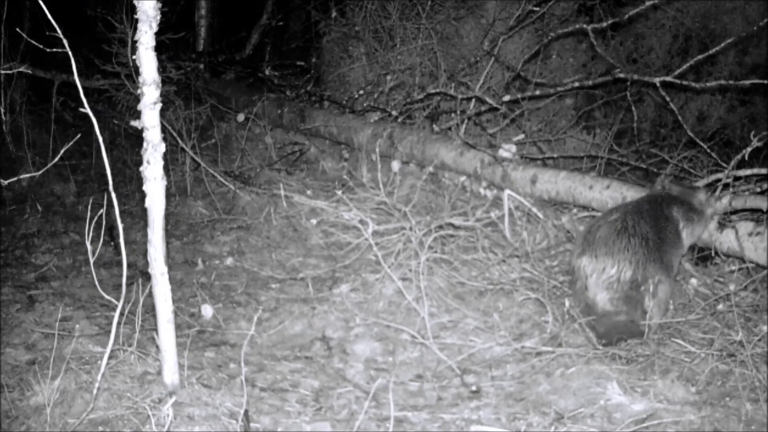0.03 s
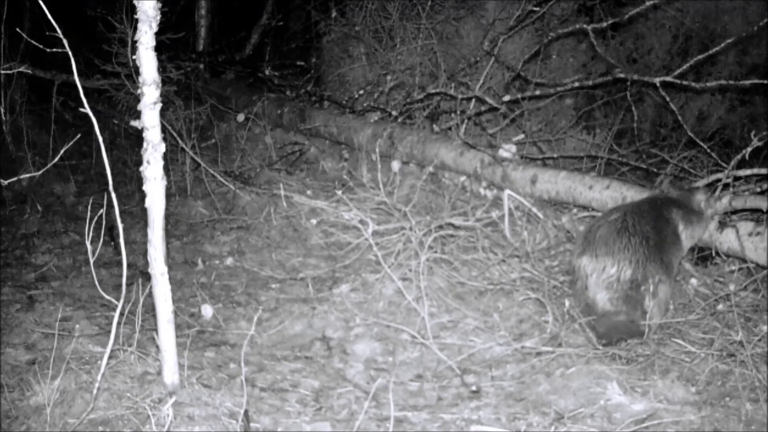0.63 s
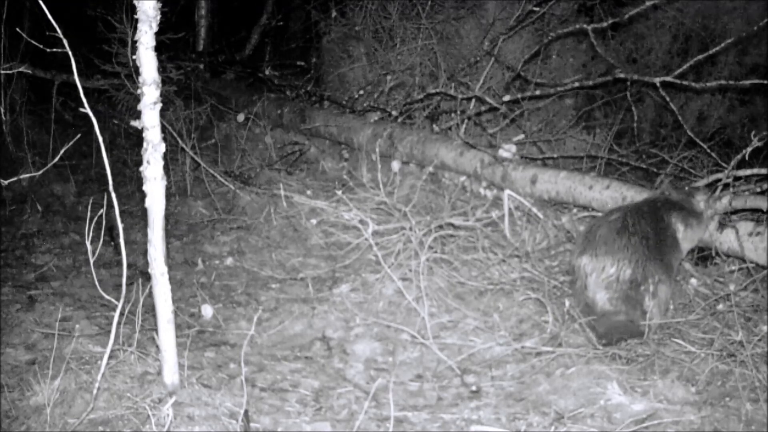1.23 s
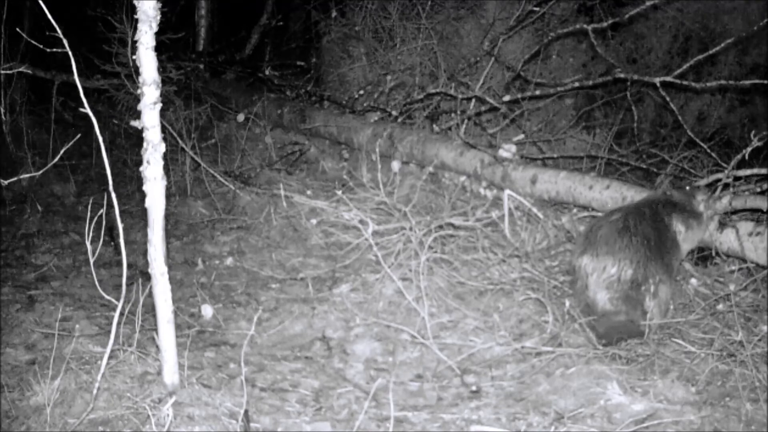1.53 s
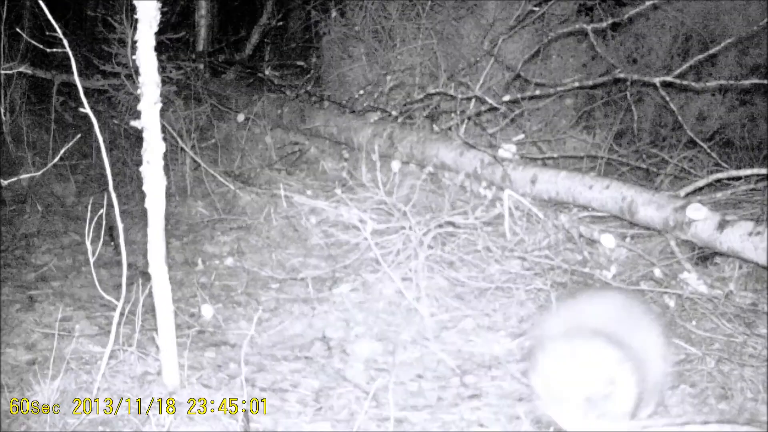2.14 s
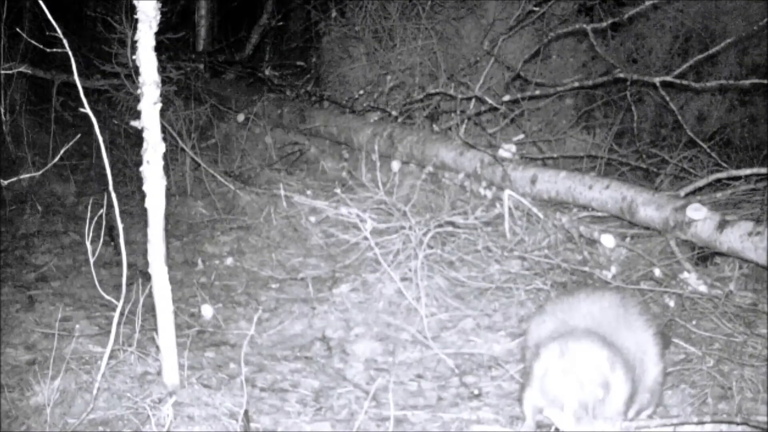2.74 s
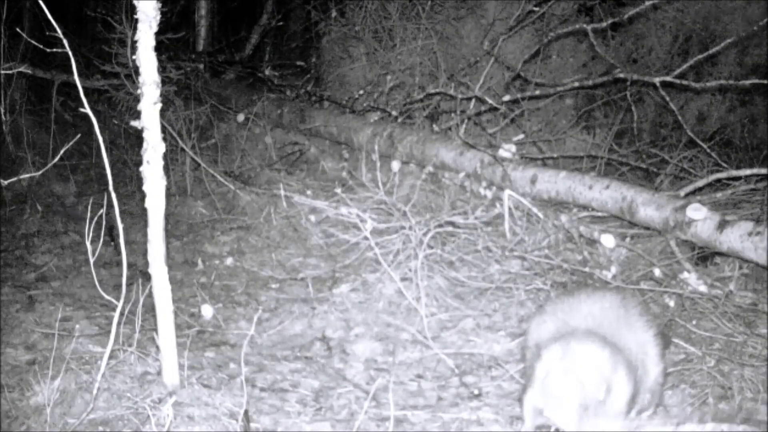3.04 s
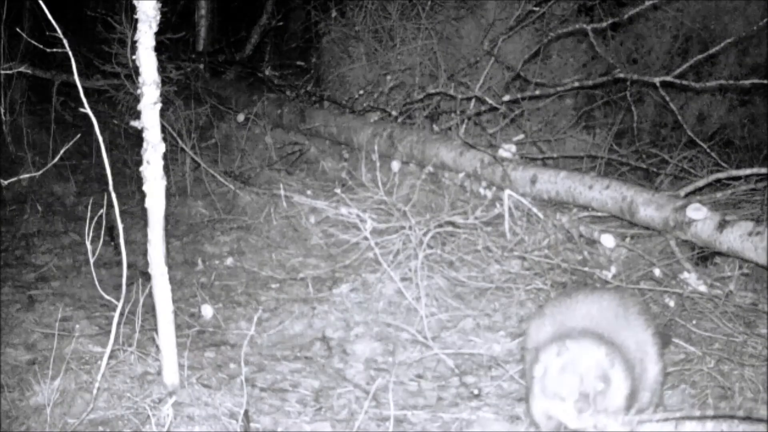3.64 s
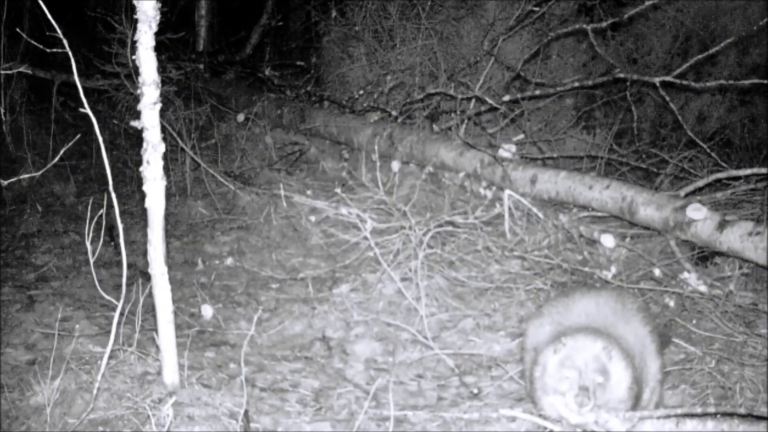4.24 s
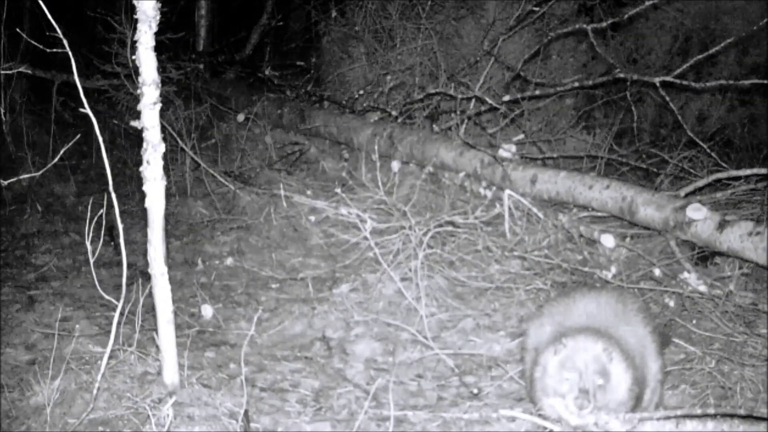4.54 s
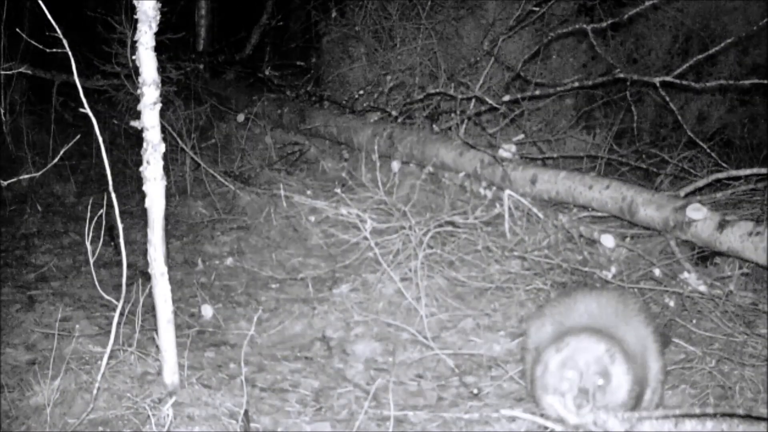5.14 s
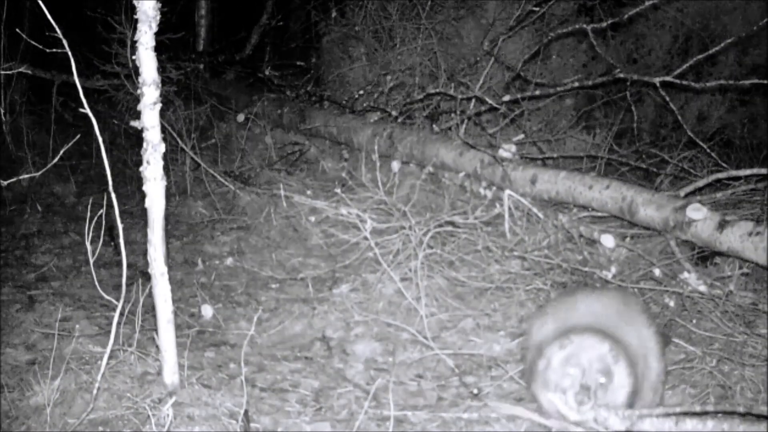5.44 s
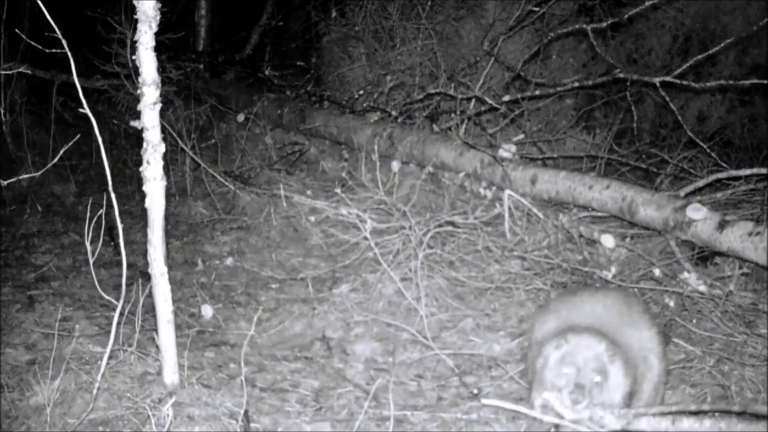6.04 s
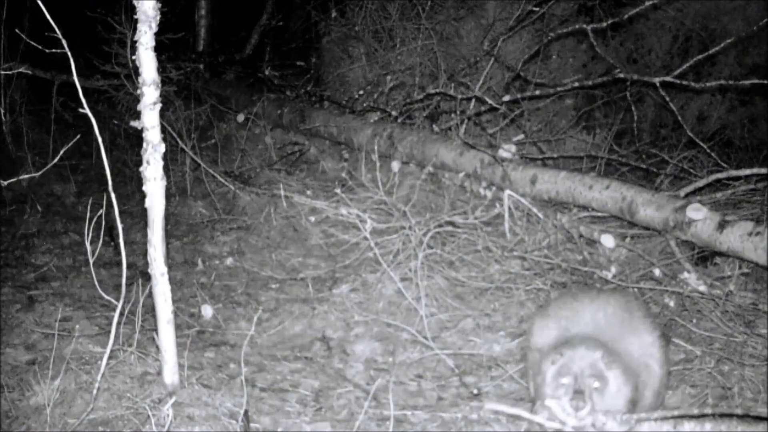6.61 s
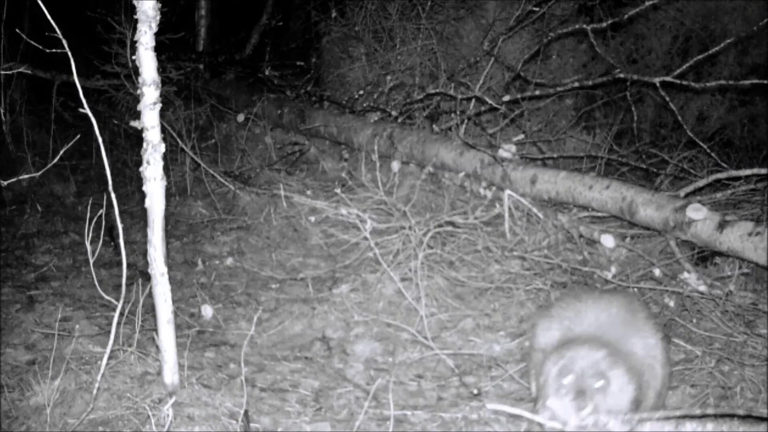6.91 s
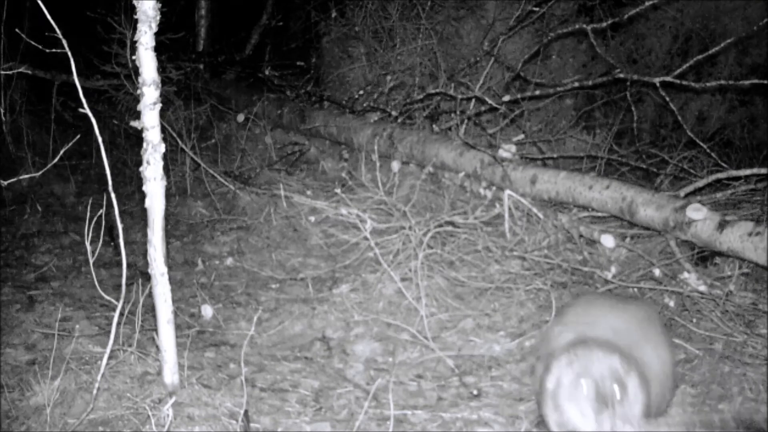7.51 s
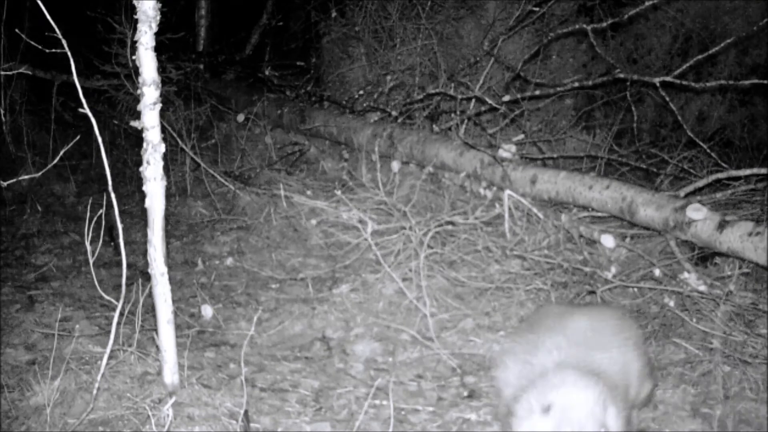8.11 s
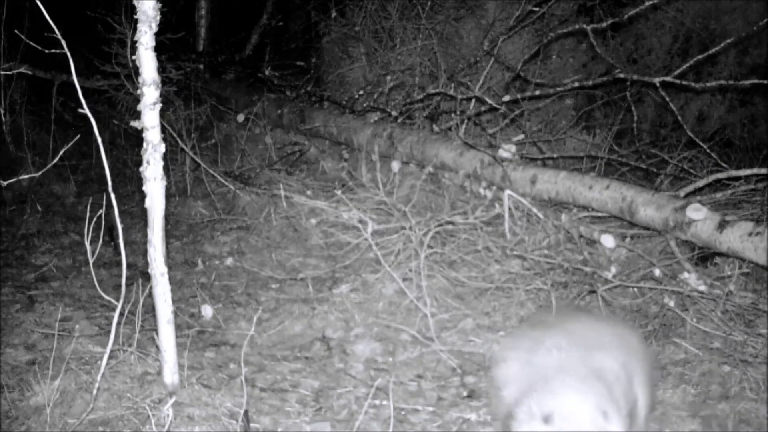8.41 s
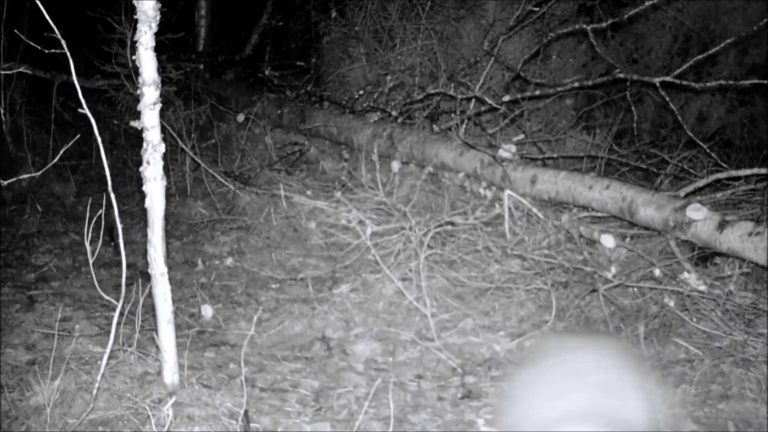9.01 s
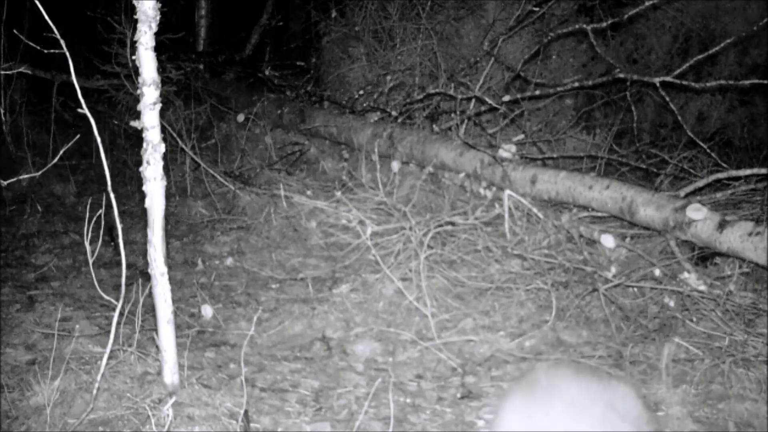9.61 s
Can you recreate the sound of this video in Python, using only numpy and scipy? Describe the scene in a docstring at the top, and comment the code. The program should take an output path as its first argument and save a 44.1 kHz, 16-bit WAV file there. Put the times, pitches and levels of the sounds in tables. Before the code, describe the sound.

Over the even hiss of an outdoor microphone, teeth scrape and tear rhythmically at a branch, which splits with a ringing crack. A tiny dropout and a pop follow. Then come soft, scattered rustles as a beaver moves through dry leaves nearby, with ticks and one sharp twig snap. The rustling grows toward the end, joined by a dragged, knocking stick and faint low puffs of air.

```python
"""First you hear a beaver gnawing a fallen tree's branch at night: seven strokes of its teeth tear
fibres and make the wood ring, until the branch gives way with a crack. The trail camera that is
listening cuts out and wakes with a pop. Now close by, the animal shifts in dry leaves and pushes
a loose stick, which scrapes and knocks. Twigs and splinters snap here and there. Behind it all are
the camera's own hiss, a faint hum and puffs of air on the microphone."""
import sys
import numpy as np
from scipy import signal
from scipy.fft import rfft, irfft
from scipy.io import wavfile

SR = 44100
rng = np.random.default_rng(int(sys.argv[2]) if len(sys.argv) > 2 else 0)


def persist_wave(psi):
    """Save psi, clipped to +-1, as 16-bit WAV."""
    counts = np.round(np.clip(psi, -1, 1) * 32767).astype(np.int16)
    wavfile.write(sys.argv[1], SR, np.atleast_2d(counts).T)


N = 430416
T = np.arange(N) / SR

# Strokes of the teeth. Each row: hardest moment in seconds, level in dB, build and release in seconds.
TOOTH_STROKES = [(0.061, -33, 0.057, 0.096), (.33, -31, 0.077, 0.071), (0.663, -30.5, 0.048, 0.069),
                 (.955, -31, 0.049, 0.099), (1.297, -48, 0.0099, 0.033), (1.483, -37, 0.013, 0.097),
                 (1.76, -37, 0.041, 0.044)]
# Bundles of fibres breaking. Each row: time in seconds, level in dB, the wood's share in dB.
FIBRE_BREAKS = [(0.0598, -24, -12), (0.34, -24, -23), (0.414, -15, -11), (0.6083, -14.5, -10),
                (0.9112, -23, -10), (0.942, -17.5, -17), (0.9557, -20, -9), (1.2885, -22.5, -4.5),
                (1.301, -20, -31), (1.3295, -17, -31), (1.486, -13, -23), (1.4944, -23, -19),
                (1.55, -17.5, -11), (1.783, -25.5, -10), (1.8157, -19.5, -5.5)]
# Sharp pitched cracks of wood: twigs snapping and splinters breaking from the bitten branch.
# Each row: time in seconds, level in dB, pitch in Hz, the raw crack's share in dB.
WOOD_CRACKS = [(0.1763, -31, 4200, -2), (0.415, -11.5, 3260, -4), (0.4168, -20.5, 1800, -9),
               (0.4578, -30, 1400, -7), (1.114, -35.5, 6600, 2), (1.3734, -29.5, 1390, -3),
               (1.9939, -40, 8500, 3), (3.1205, -39, 9800, 4), (3.7097, -30, 7200, 2.5),
               (5.0478, -37, 2600, 1), (5.648, -40.5, 5570, 0), (6.342, -35.5, 6400, -3),
               (6.759, -47, 1660, 11), (6.8126, -17, 2470, -6.5), (7.187, -29.5, 2870, -1),
               (7.4313, -30, 4700, 2.5), (7.7107, -37, 9640, 7), (7.9312, -37, 4530, -1),
               (8.3164, -33, 11300, -1), (8.3821, -31.5, 8850, 1.5), (8.6575, -28.5, 4400, 4),
               (8.9679, -27.5, 4500, 3.5), (9.091, -33, 9900, 5.5), (9.2113, -32.5, 8400, 7),
               (9.7268, -27.5, 2930, 0)]
# The animal shifts in the leaves. Each row: fullest moment in seconds, level in dB, length in seconds.
SHUFFLES = [(2.285, -41, 0.031), (2.343, -47, 0.065), (2.448, -47, 0.16), (2.8, -52, 0.066),
            (3.3, -44.5, 0.048), (3.584, -42, 0.089), (3.91, -44.5, .06), (5.054, -41.5, 0.026),
            (5.218, -42.5, 0.21), (5.588, -50.5, .11), (6.35, -49, .04), (6.806, -42, .03),
            (6.978, -44, .11), (7.11, -51, .05), (7.195, -44, 0.067), (7.653, -45.5, 0.36),
            (7.804, -42.5, 0.18), (7.94, -39, 0.031), (8.08, -45, .05), (8.154, -40.5, 0.08),
            (8.228, -41, 0.033), (8.277, -40, .06), (8.66, -36, 0.039), (8.763, -49, 0.11),
            (9.013, -43.5, 0.15), (9.213, -49, 0.073), (9.438, -50, 0.23), (9.736, -39, 0.19)]
# Drags of the stick. Each row: hardest moment in seconds, level in dB, build and release in seconds.
STICK_DRAGS = [(7.243, -41.5, 0.017, 0.015), (8.165, -44, 0.15, 0.031), (8.265, -44, 0.064, 0.075),
               (9.05, -43, 0.075, 0.1), (9.385, -37.5, 0.047, 0.062), (9.5, -39.5, 0.065, 0.14),
               (9.72, -43.5, 0.077, .06)]
# The stick catches. Each row: time in seconds, level in dB, the bright click's share in dB.
STICK_KNOCKS = [(8.156, -42.5, 10), (8.1812, -33, -12), (8.261, -34, -6), (8.715, -31, -9),
                (8.782, -36, -4), (8.919, -38, -14), (9.3822, -34, 1), (9.4447, -36, -4),
                (9.4668, -31.5, 3), (9.4934, -32, -1), (9.5156, -31.5, -5), (9.569, -38, -7)]
# Air moving on the microphone. Each row: time in seconds, level in dB.
SLOW_DRAUGHT = [(0, -38.5), (2.9, -37), (3.5, -30), (5.5, -38.5), (5.85, -27), (7.9, -28), (8.5, -16),
                (9.0, -26.5), (9.76, -25.5)]
AIR_PUFFS = [(.47, -28), (1.38, -35), (3.42, -34), (4.248, -29), (5.08, -36.5), (5.85, -23), (7.3, -20),
             (8.2, -39), (8.57, -17)]

# Tones that wood rings with. Each row: pitch in Hz, width in Hz (wider dies sooner), level in dB.
BITE_TONES = [(2510, 540, -1.5), (3620, 400, -0.5), (4840, 690, -2.5), (5570, 280, 1.5), (6330, 420, 7),
              (8380, 540, 6.5), (9000, 960, 3.5), (11030, 1140, 3), (11500, 330, 3), (13060, 840, 3),
              (15200, 900, -8)]  # the bright rasp at the teeth
BRANCH_TONES = [(136, 105, -6.5), (508, 26, -7.5), (865, 89, -12), (1071, 41, -2.5), (1320, 65, -3),
                (1378, 123, 1), (1437, 104, 2.5), (1805, 58, -8), (2035, 56, -10.5)]  # the gnawed wood
LIMB_TONES = [(173.5, 21, -1), (287, 13, -3), (343, 17, -2), (402, 37, -13), (503, 19, -6.5),
              (580, 29, -13), (712, 78, -12), (925, 40, -7.5)]  # the low ring of the whole limb
SPLIT_TONES = [(1400, 110, 5), (1940, 100, 0.5), (2340, 260, -8), (3960, 550, -4.5), (5630, 3200, -15),
               (7700, 360, 4), (8850, 1200, -9), (10430, 780, -7.5), (13700, 950, -7)]  # the bright final crack
STICK_TONES = [(706, 120, -0.5), (1278, 115, 3.5), (1620, 220, -8), (1839, 66, 5), (2660, 730, -8),
               (4000, 980, -6), (4830, 330, -4.5), (6000, 450, -14.5), (7400, 270, -8)]  # the loose stick

# Leaves of different sizes crinkling. Each row: middle pitch in Hz, level in dB.
CRINKLE_BANDS = [(2000, -8), (3200, -7), (4800, -1.5), (7000, -1), (9800, -2.5), (13000, 0)]
# Tone colours: how strong the lows and highs are. Each row: frequency in Hz, relative level in dB.
LEAF_COLOUR = [(300, 3.5), (1300, 4), (3000, 2.5), (5500, 4.5), (7500, 5), (9700, 6.5), (12500, -2),
               (15000, -1.5)]
KNOCK_COLOUR = [(300, 1), (1300, -2.5), (1850, 4), (2500, 4), (4000, -3.5), (9000, -5.5)]
HISS_COLOUR = [(30, 12), (100, 4), (300, 0), (600, -2.5), (1200, -7.5), (3000, -12), (7000, -16.5),
               (15000, -17.5)]
AIR_COLOUR = [(1, -6.5), (7, 1.5), (14, -7.5), (25, -12.5), (45, -33), (90, -38.5), (300, -84),
              (1000, -100)]

LEAD_S = .008  # every crack begins this long before its peak


def gnawing():
    """The front teeth stick and slip through the wood; each slip tears fibres and shakes the branch."""
    slips = fading_pulses(rate=260, spread_db=1.5, fade_s=.0028)
    tearing = grains(rate=7000, spread_db=4.5) * (.5 + .34 * unit(slips))
    teeth, limb = np.zeros(N), np.zeros(N)
    for s, db, build, release in TOOTH_STROKES:
        cut = stroke(s, build, release) * tearing
        teeth += undb(db) * cut
        limb += undb(-48 + 6.5 * s) * cut  # the deeper the notch, the more the limb swings
    fibres, wood = undb(-6) * teeth, undb(-4) * teeth
    for s, db, wood_db in FIBRE_BREAKS:
        crack = undb(db) * fracture(tail_db=-12, tail_s=.011)
        add(fibres, s, undb(-5) * crack)
        add(wood, s, undb(wood_db + 2) * crack)
    return ring(fibres, BITE_TONES) + ring(wood, BRANCH_TONES) + ring(limb, LIMB_TONES)


def branch_break(break_s=1.9025, rip_s=.024):
    """The last bite splits the wood and frees the limb, which rings low while its last splinters rip."""
    ripping = (T > break_s) * np.exp(-np.abs(T - break_s) / rip_s)
    jolt = undb(-17.5) * grains(rate=3200, spread_db=4) * ripping
    jolt[int(break_s * SR)] += 3  # one sharp kick as the limb comes free
    split = np.zeros(N)
    add(split, break_s, fracture(tail_db=-20.5, tail_s=.016))
    return undb(-8) * (ring(jolt, LIMB_TONES) + undb(3) * ring(split, SPLIT_TONES))


def wood_cracks():
    """Twigs, and splinters of the bitten branch, crack sharply and spring back at their own pitch."""
    snaps = np.zeros(N)
    for s, db, hz, crack_db in WOOD_CRACKS:
        crack = fracture(tail_db=-14, tail_s=.012)
        kick = .4 * crack
        kick[int(LEAD_S * SR)] += 5
        width = .3 * hz
        band = signal.butter(2, [hz - width / 2, hz + width / 2], "band", fs=SR)
        twang = signal.lfilter(*band, kick) * np.sqrt(SR / 2 / width)
        add(snaps, s, undb(db) * (twang + undb(crack_db) * crack))
    return colour(snaps, [(200, 9), (1500, 3.5), (9000, 7.5), (15000, 3.5)])


def rustling_leaves(sets_off_s=6.23, rise_db_per_s=4.5, crispness=.57):
    """Fur brushes dry leaves, which crinkle with each shuffle and stir more as the animal comes near."""
    stirring = undb(-59.5 + rise_db_per_s * np.maximum(T - sets_off_s, 0))
    shuffle_power = sum((undb(db) * swell(s, length, build=.55)) ** 2 for s, db, length in SHUFFLES)
    motion = np.sqrt(stirring ** 2 + shuffle_power)
    brush = np.sqrt(1 - crispness ** 2) * grains(rate=12000, spread_db=-2.5)
    crinkle = np.zeros(N)
    for hz, db in CRINKLE_BANDS:
        crumple = fading_pulses(rate=90, spread_db=5.5, fade_s=.0016)
        band = signal.butter(2, [hz * .75, hz * 1.25], "band", fs=SR)
        crinkle += undb(db) * signal.lfilter(*band, crumple * rng.standard_normal(N))
    return colour(brush + crispness * unit(crinkle), LEAF_COLOUR) * motion


def dragged_stick():
    """The stick scrapes over the ground, catching now and then with a scuffing knock."""
    force = sum(undb(db) * stroke(s, build, release) for s, db, build, release in STICK_DRAGS)
    scrape = force * grains(rate=1800, spread_db=3.5)
    knocks, clicks = np.zeros(N), np.zeros(N)
    for s, db, click_db in STICK_KNOCKS:
        scuff = fracture(tail_db=-3, tail_s=.006)
        add(knocks, s, undb(db) * scuff)
        add(clicks, s, undb(db + click_db) * scuff)
    return ring(scrape + colour(knocks, KNOCK_COLOUR), STICK_TONES) + colour(clicks, LEAF_COLOUR)


def hiss_and_air(hum_hz=167):
    """The camera's even hiss, a faint hum, and slow air that now and then puffs on the microphone."""
    hiss = undb(-42.5) * colour(rng.standard_normal(N), HISS_COLOUR)
    hum = undb(-59) * np.sin(2 * np.pi * hum_hz * T)
    draught = undb(np.interp(T, *np.transpose(SLOW_DRAUGHT)))
    puffs = sum(undb(db) * swell(s, length=.16, build=.44) for s, db in AIR_PUFFS)
    return hiss + hum + (draught + puffs) * colour(rng.standard_normal(N), AIR_COLOUR)


def fracture(tail_db, tail_s, crackle_s=.0025, rise_s=.00035, fall_s=.0008):
    """One crack: the first fibres crackle, the rest part at once, and splinters die away."""
    t = T[:SR // 10] - LEAD_S
    snap = np.exp(np.where(t < 0, t / rise_s, -t / fall_s))
    splinters = np.exp(np.where(t < 0, t / crackle_s, -t / tail_s))
    return (snap + undb(tail_db) * splinters) * rng.choice([-1, 1], len(t))


def grains(rate, spread_db):
    """Tiny clicks of uneven size at random moments, about `rate` of them a second."""
    sizes = undb(spread_db * np.minimum(rng.exponential(size=N), 4))
    return unit((rng.random(N) < rate / SR) * sizes * rng.choice([-1, 1], N))


def fading_pulses(rate, spread_db, fade_s):
    """A strength that jumps up at random moments and fades after each jump."""
    return signal.lfilter([1], [1, -np.exp(-1 / (fade_s * SR))], np.abs(grains(rate, spread_db)))


def stroke(s, build, release):
    """A push that builds to its hardest at time s and lets go."""
    return np.sqrt(np.interp(T, [s - build, s, s + release], [0, 1, 0]))


def swell(s, length, build):
    """A smooth rise and fall, fullest at time s; build is the share of the length spent rising."""
    return np.exp(-((T - s) / (length * np.where(T < s, build, 1 - build))) ** 2)


def ring(x, tones):
    """Wood shaken by x rings with these tones, each dying away at its own speed."""
    t = T[:SR // 5]
    ringing = sum((-1) ** k * undb(db) * width * np.exp(-np.pi * width * t) * np.sin(2 * np.pi * hz * t)
                  for k, (hz, width, db) in enumerate(tones))
    return signal.fftconvolve(x, ringing / np.linalg.norm(ringing))[:len(x)]


def colour(x, points):
    """Turn the lows and highs of x up or down along a curve of (Hz, dB) points."""
    hz, db = np.transpose(points)
    frequencies = np.arange(N // 2 + 1) * SR / N
    gain = undb(np.interp(np.log(frequencies + 1e-9), np.log(hz), db))
    gain /= np.sqrt(np.mean(gain ** 2))
    # Fold the filter forward in time, so it rings after a click and never before it.
    folded = irfft(np.log(gain), N)
    folded[1:N // 2] *= 2
    folded[N // 2 + 1:] = 0
    return irfft(rfft(x) * np.exp(rfft(folded)), N)


def add(track, s, crack):
    """Mix a crack into the track so that it peaks at time s."""
    start = int((s - LEAD_S) * SR)
    track[start:start + len(crack)] += crack[:N - start]


def undb(db):
    """Turn decibels into a number to multiply by."""
    return 10 ** (np.asarray(db) / 20)


def unit(x):
    """Scale x so that its typical swing is 1."""
    return x / np.std(x)


def scene():
    """Everything that reaches the one microphone."""
    beaver = gnawing() + branch_break() + wood_cracks() + rustling_leaves() + dragged_stick()
    return (beaver + hiss_and_air())[None]


def record(dry):
    """The camera goes silent, then wakes with a voltage pop and brief ticking as the sound fades up."""
    stop_s, wake_s, ticks_per_s, highest_hz = 2.083, 2.110, 62.4, 15250
    awake_s = np.maximum(T - wake_s, 0)
    volume = (T < stop_s) + (T >= wake_s) * (1 - .5 * np.exp(-awake_s / .08))
    pop = (T >= wake_s) * undb(-13.5) * np.exp(-awake_s / .12)
    ticks = np.diff(np.floor(awake_s * ticks_per_s), prepend=0)
    ticks *= undb(-17.5) * np.exp(-awake_s / .086)
    buzz = colour(ticks, [(300, 6), (1200, -3), (4000, -23), (12000, -24)])
    treble_cut = signal.ellip(8, .2, 70, highest_hz, fs=SR, output="sos")
    return signal.sosfilt(treble_cut, dry * volume + pop + buzz)


dry = scene()
out = record(dry)
persist_wave(out)
```